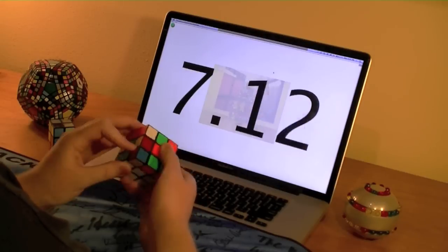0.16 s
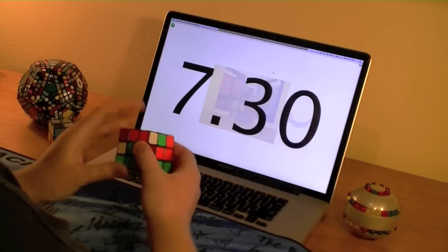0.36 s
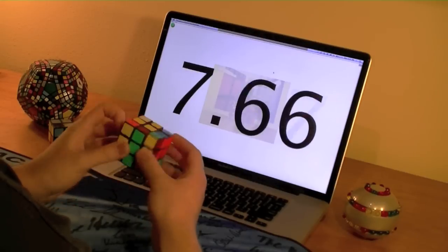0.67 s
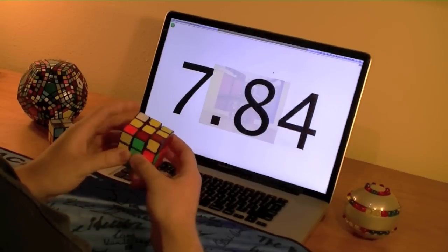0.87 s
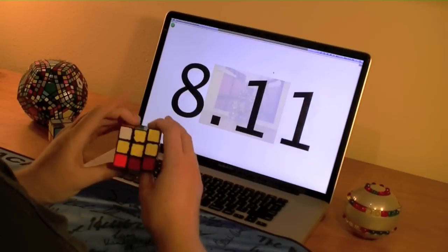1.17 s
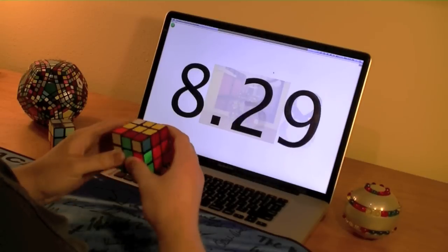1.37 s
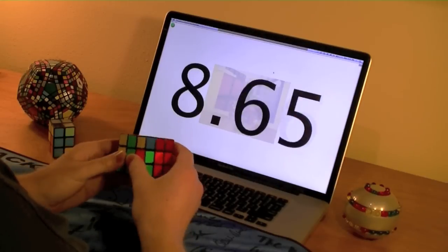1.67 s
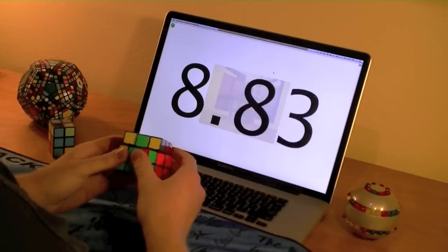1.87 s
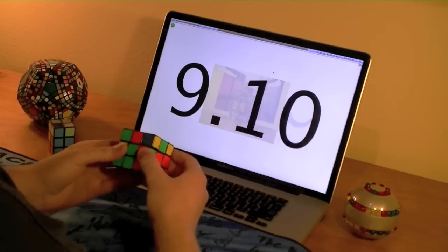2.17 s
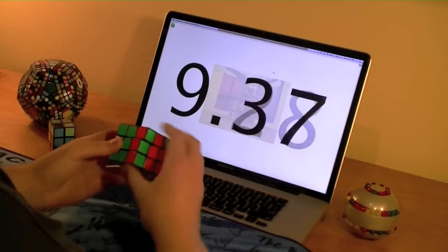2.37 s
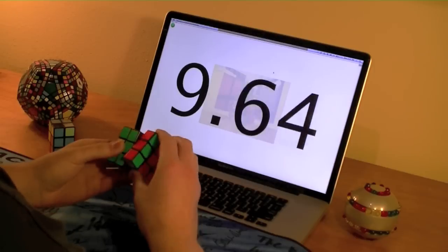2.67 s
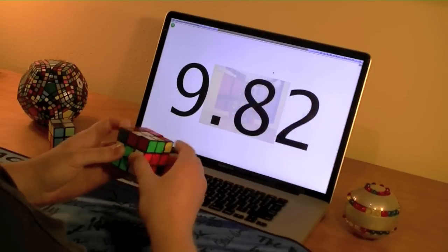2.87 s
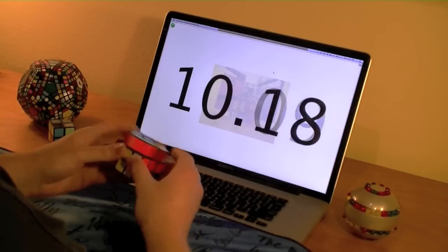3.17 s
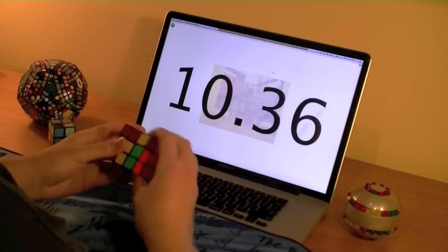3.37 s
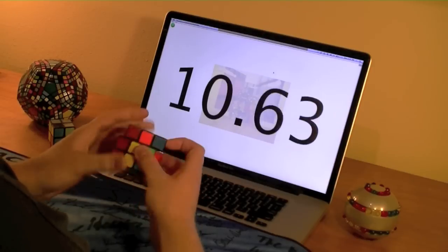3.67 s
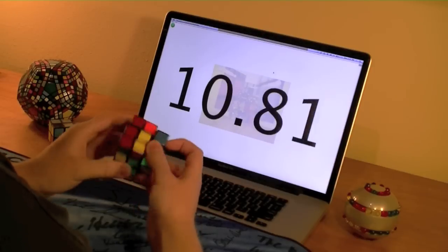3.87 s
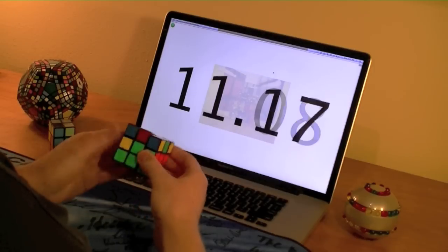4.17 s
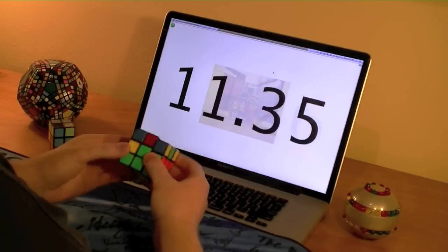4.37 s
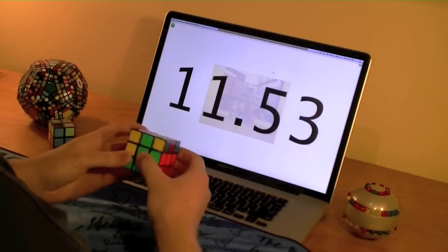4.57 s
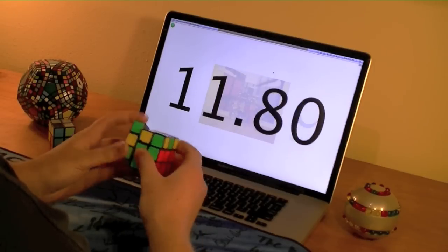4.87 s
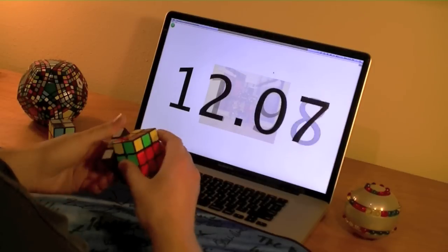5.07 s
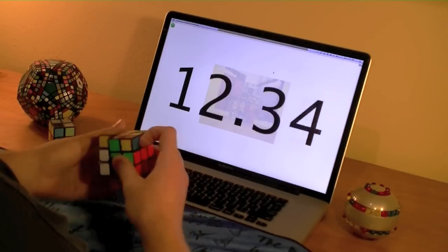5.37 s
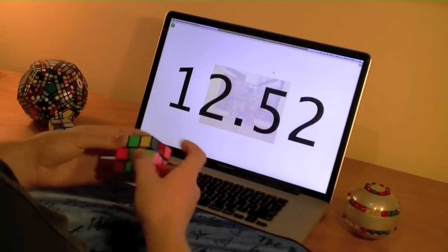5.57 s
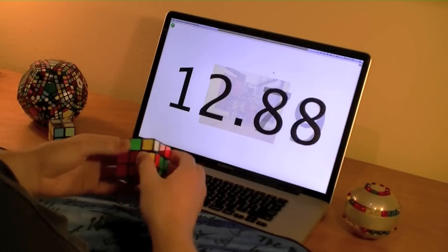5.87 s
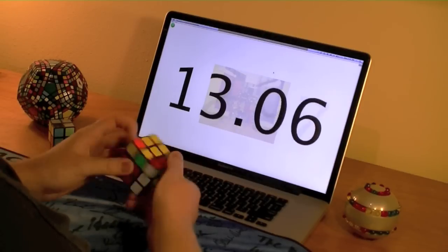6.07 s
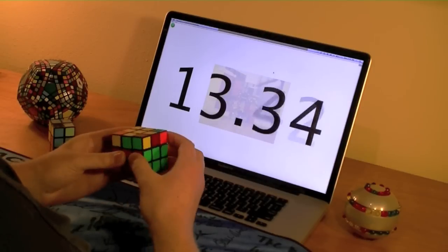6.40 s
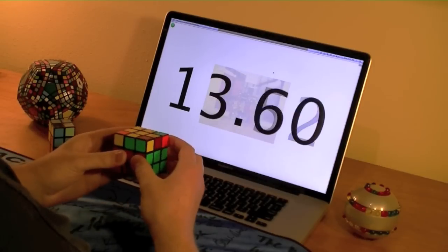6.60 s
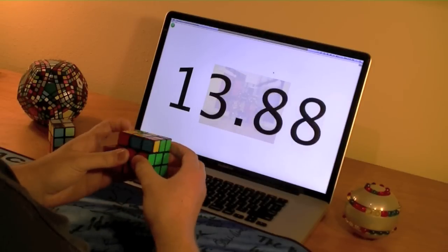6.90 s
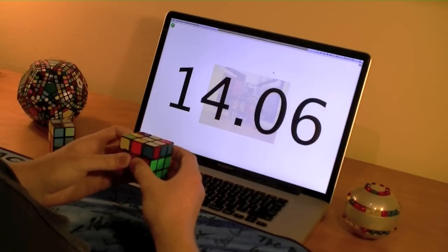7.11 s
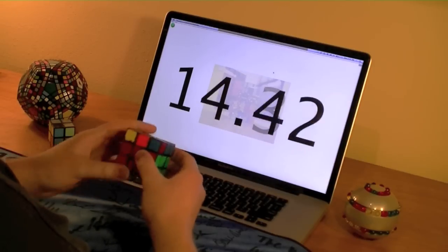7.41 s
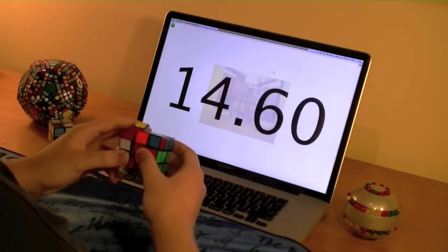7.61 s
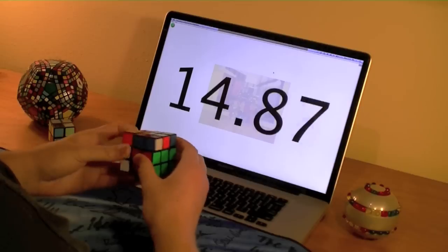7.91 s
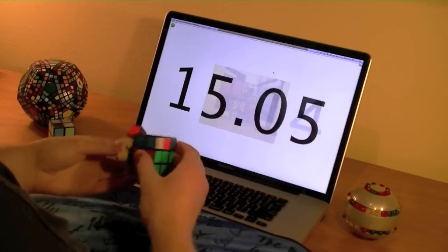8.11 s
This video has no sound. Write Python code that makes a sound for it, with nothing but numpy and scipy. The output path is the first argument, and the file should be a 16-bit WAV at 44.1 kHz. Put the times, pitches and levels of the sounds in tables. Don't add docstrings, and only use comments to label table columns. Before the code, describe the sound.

A plastic puzzle cube is turned fast by hand over a desk. Crisp locking snaps, flat slaps and hollow knocks come in irregular clusters, joined by very short gritty slides. Between clusters only faint finger touches remain. A close stereo microphone in a small quiet room catches a short reverberation over soft air noise and faint low hum.

```python
import sys
import numpy as np
from scipy import signal
from scipy.fft import rfft, irfft, next_fast_len
from scipy.io import wavfile

SR = 44100
rng = np.random.default_rng(int(sys.argv[2]) if len(sys.argv) > 2 else 0)


def ratio_of_db(decibels):
    return 10 ** (np.asarray(decibels, float) / 20)


def transcribe(signal):
    frames = np.atleast_2d(signal).T
    limited = np.clip(frames, -1, 1)
    pcm = np.round(limited * 32767).astype(np.int16)
    wavfile.write(sys.argv[1], SR, pcm)


N = 363825

# time in seconds, level in dB,
# hollow thud relative to it in dB, bright tick relative to it in dB.
LOCKS = [(.0307, -22.5, -0.5, 0.5), (.2012, -18, 2, 4.5), (.2352, -23, -5, -2.5), (.6849, -17, -25, 5.5),
         (.6864, -21, 4, -3), (.8358, -23.5, -8.5, -1.5), (2.3145, -27.5, 4.5, 1),
         (2.8569, -18.5, 3.5, -1.5), (2.8948, -19, -34, 1.5), (2.9037, -12, -5.5, 1),
         (3.204, -27, -14, 9.5), (3.2645, -32, 9, 3), (3.3008, -21.5, -12, 1), (3.9768, -23.5, 1.5, -21),
         (4.5319, -23, -1.5, 4.5), (4.7492, -19.5, -23, 0), (4.7609, -11.5, -13.5, 0.5),
         (4.9875, -18.5, -8, -1.5), (5.0331, -14, -2.5, -1), (5.4154, -17.5, -1, 2), (5.654, -27.5, 5, 6.5),
         (6.0641, -21, -13, -1), (6.0966, -21.5, 1, 0), (6.1736, -20.5, 2, -1), (6.2445, -21.5, -10.5, 2.5),
         (7.8611, -20, -3, 5), (7.9077, -16.5, -11, 3.5), (8.1636, -17.5, -2.5, 2),
         (8.2237, -23.5, 0.5, 8.5), (8.2307, -20.5, -4.5, 5)]
# time in seconds, level in dB.
CATCHES = [(.5502, -45.5), (.9947, -50), (2.0017, -32), (2.3191, -29.5), (2.8271, -35.5), (3.1024, -39),
           (3.304, -23), (3.3902, -32), (3.6856, -33), (3.688, -32.5), (3.9638, -24), (3.9804, -22.5),
           (4.4963, -36), (4.5259, -26), (5.7191, -34), (5.9401, -42.5), (6.6924, -40), (6.8171, -43),
           (6.8555, -27), (6.9941, -26.5), (7.054, -35), (7.1009, -28), (7.2212, -38.5), (7.5939, -57),
           (7.8303, -38.5), (7.8859, -21.5), (8.1291, -25)]
# time in seconds, level in dB.
CLACKS = [(.135, -32), (.169, -34), (.1941, -25.5), (.4165, -35), (.6729, -29.5), (1.2996, -45.5),
          (1.4396, -47.5), (2.5934, -43), (3.1962, -32.5), (3.2558, -21.5), (3.4664, -26), (3.7232, -31),
          (3.9564, -44), (4.4847, -41), (4.6439, -40), (4.7388, -30), (4.7454, -25), (5.0305, -14),
          (5.2613, -46), (5.3696, -30.5), (5.4091, -30), (5.658, -23), (6.1334, -21), (6.838, -41),
          (6.9569, -43), (7.5485, -42), (7.5659, -41), (7.6109, -35.5), (8.1843, -19)]
# time in seconds, level in dB.
KNOCKS = [(.0178, -47), (.1541, -33.5), (.4467, -39.5), (.6275, -48), (.6367, -36.5), (.8284, -33.5),
          (1.8222, -44.5), (1.9798, -50), (1.9957, -29.5), (2.2653, -43), (2.2978, -35.5), (2.6278, -45.5),
          (3.3968, -32.5), (3.4206, -24), (3.7393, -33), (3.8304, -40.5), (4.1865, -46.5), (4.7009, -31.5),
          (4.9228, -38), (5.2712, -31.5), (5.3226, -35.5), (5.5873, -39), (6.0373, -34.5), (6.0813, -26),
          (6.1223, -27.5), (6.8423, -35), (7.4615, -46.5), (7.6844, -42.5), (7.8596, -24), (7.893, -26.5)]
# time in seconds, level in dB.
NUDGES = [(.1038, -38), (.8023, -29), (1.1154, -47), (1.4435, -44), (1.5731, -51), (1.8508, -41),
          (2.251, -58), (2.2835, -49.5), (2.5099, -43.5), (2.5415, -44), (3.1666, -49), (3.1764, -49),
          (3.5921, -51), (3.6506, -65), (3.6697, -46.5), (3.7595, -34), (3.9485, -64), (4.2385, -48),
          (4.4528, -51), (4.9114, -28), (5.8954, -30.5), (5.9949, -35.5), (7.589, -36), (7.6614, -44.5),
          (7.773, -46)]
# time in seconds, level in dB.
TOUCHES = [(1.071, -49), (1.1857, -56), (1.3728, -53.5), (1.4245, -57), (1.5224, -53), (1.6362, -56),
           (1.7554, -57), (1.7909, -53), (2.1525, -64), (2.1934, -55), (2.4793, -55), (4.4147, -56),
           (6.4293, -58), (6.4572, -55.5), (7.4413, -56), (7.759, -59), (8.108, -58)]
# time in seconds, level in dB.
FLICKS = [(.3544, -53.5), (.5143, -59), (2.4277, -50.5), (2.7816, -66), (3.25, -26), (3.902, -52),
          (6.9527, -51.5), (7.1009, -38.5), (7.5416, -47), (7.6109, -46.5)]
# hollow thud and bright tick, relative dB.
CATCH_COLOUR, CLACK_COLOUR, KNOCK_COLOUR = (-1.3, 2.33), (-18, -3.8), (3.1, -6.5)
NUDGE_COLOUR, TOUCH_COLOUR, FLICK_COLOUR = (1, -2), (-2.5, -2.5), (-23, 9.7)


def contacts():
    kinds = [(CATCHES, CATCH_COLOUR), (CLACKS, CLACK_COLOUR), (KNOCKS, KNOCK_COLOUR),
             (NUDGES, NUDGE_COLOUR), (TOUCHES, TOUCH_COLOUR), (FLICKS, FLICK_COLOUR)]
    shaded = [row + shade for rows, shade in kinds for row in rows]
    return np.transpose(LOCKS + shaded)


DESK_ECHO_S, DESK_ECHO_DB = 0.0032, -10


def snaps(knock_s, thud_s, size=600):
    s, peak_db, thud_db, tick_db = contacts()
    t = np.arange(size) / SR
    first = np.round((s - knock_s) * SR).astype(int)
    at = (first[:, None] + np.arange(size)).ravel()
    rattle = rng.standard_normal((len(s), size))
    parts = [(thud_db + 0.5, thud_s), (0 * s, knock_s), (tick_db + 4.0, knock_s)]
    out = np.zeros((2, N))
    for k, (db, tau) in enumerate(parts):
        knock = t / tau * np.exp(-t / tau)
        echo = ratio_of_db(DESK_ECHO_DB) * np.interp(t - DESK_ECHO_S, t, knock)
        shape = rattle * (knock + echo)
        shape = shape / np.sqrt(np.sum(shape ** 2, axis=1, keepdims=True))
        strength = ratio_of_db(peak_db + db)[:, None]
        click = t == 0
        trains = [np.bincount(at, (strength * w).ravel(), N + size)[:N] for w in (shape, click)]
        out += split(np.array(trains) + 1e-18)[k]
    return out


# start of full speed in seconds, time held in seconds,
# grit level in dB, hollow share in dB.
TURNS = [(.04, 0.03, -43, 3), (0.149, 0.09, -37, -9), (.43, .01, -61.5, -2), (.55, 0.025, -52, -1),
         (.69, 0.074, -36.5, -3), (1.856, .01, -49.5, 1), (2.004, 0.037, -42.5, 1.5),
         (2.327, 0.014, -30.5, -1.5), (2.871, 0.082, -33, 1), (3.209, .02, -34.5, 0),
         (3.253, 0.016, -29, 1.5), (3.43, 0.04, -45, 8), (3.68, .25, -62, 1), (3.973, .005, -30, -13),
         (4.533, 0.0042, -27.5, 0.5), (4.761, 0.0027, -33, 4.5), (4.919, 0.0085, -35, -15),
         (5.039, 0.025, -35, -10), (5.27, .26, -47.5, 0), (5.598, 0.0037, -44, 6), (5.659, 0.046, -41, -4),
         (5.899, 0.0054, -48.5, 2.5), (6.091, 0.063, -30.5, -10), (6.199, 0.069, -38.5, 1.5),
         (6.865, 0.011, -35, -1.5), (7.115, 0.014, -37, -1.5), (7.545, .005, -45, -4),
         (7.874, 0.023, -32, 0.5), (8.171, 0.075, -30, -6.5)]
SPEED_UP_DB_PER_S, SLOW_DOWN_DB_PER_S = 500, 445


def turning(t):
    s, held, db, hollow_db = np.transpose(TURNS)[:, :, None]
    before = np.maximum(s - t, 0)
    after = np.maximum(t - s - held, 0)
    each = ratio_of_db(db - SPEED_UP_DB_PER_S * before - SLOW_DOWN_DB_PER_S * after)
    return np.sum(each, axis=0), np.sum(each * ratio_of_db(hollow_db), axis=0)


# time in seconds, level in dB.
GRIP = [(0, -64), (.9, -62), (1.78, -72), (2.42, -64.5), (2.8, -65.5), (3.1, -50.5), (4.1, -68),
        (4.44, -68.5), (4.85, -63.5), (5.85, -57.5), (6.36, -77), (6.67, -79), (6.72, -67), (7.3, -71.5),
        (7.63, -57.5), (8.25, -84)]
GRIP_HOLLOW_DB = 0.5


def slide(per_s, spread_db, smooth, slip_t60):
    t = np.arange(N) / SR
    turn, hollow = [np.interp(t, t[::32], v) for v in turning(t[::32])]
    grip = ratio_of_db(np.interp(t, *np.transpose(GRIP)))
    sizes = ratio_of_db(spread_db * np.minimum(rng.exponential(1, N), 4))
    slipping = rng.random(N) < per_s / SR
    slips = np.sqrt(linger(sizes ** 2 * slipping, slip_t60))
    grains = (rms_one(slips) + smooth) * rng.standard_normal(N)
    low, middle, high = split(grains)
    return (hollow + ratio_of_db(GRIP_HOLLOW_DB) * grip) * low + (turn + grip) * (middle + high)


RING_HZ = [607, 679, 721, 804, 879, 958, 1018, 1156, 1266, 1685, 1864, 2189, 2920]
# level in dB, t60 in seconds.
RING_DECAY = [(-4, 0.22), (-14, 0.2), (0, 0.13), (-1, 0.13), (-6, 0.12), (-5, 0.11), (0.5, 0.1),
              (-6, 0.07), (-5, 0.11), (-10, 0.08), (-11, 0.09), (-9, 0.06), (-14, 0.033)]
DRIFT_S, DRIFT_DB = .08, 3.5


def ringing(x):
    t = np.arange(N) / SR
    steps = np.arange(0, N / SR + DRIFT_S, DRIFT_S)
    freedom = rng.standard_normal((len(RING_DECAY), len(steps)))
    out = 0
    for hz, (db, t60), free in zip(RING_HZ, RING_DECAY, freedom):
        r, w = ratio_of_db(-60 / (t60 * SR)), 2 * np.pi * hz / SR
        damping_db = DRIFT_DB * np.interp(t, steps, np.minimum(free, 1))
        struck = x * ratio_of_db(db + damping_db)
        out = out + signal.lfilter([0, np.sin(w)], [1, -2 * r * np.cos(w), r * r], struck)
    return out


# time in seconds, peak level in dB, pitch in Hz.
BUMPS = [(2.65, -53, 211), (4.427, -53.5, 170), (5.036, -47, 208), (5.182, -60, 260), (7.774, -55, 197)]


def bumps(soft_s):
    s, db, hz = np.transpose(BUMPS)[:, :, None]
    t = np.maximum(np.arange(N) / SR - s, 0)
    swell = np.e * t / soft_s * np.exp(-t / soft_s)
    return np.sum(ratio_of_db(db) * swell * np.sin(2 * np.pi * hz * t), axis=0)


# frequency in Hz, t60 in seconds.
ROOM_T60 = [(300, 1), (800, 0.56), (2000, 0.33), (5500, 0.32), (9000, 0.3), (14000, 0.15)]


def room(x, early_db, early_t60, arrive_t60, first_s, lumpy_db):
    x = np.concatenate([np.zeros(round(first_s * SR)), x])[:N]
    clusters = rms_one(linger(rng.standard_normal(N), 0.0036))
    lumps = ratio_of_db(lumpy_db * clusters)
    white = rng.standard_normal((2, 2, N)) * rms_one(lumps)
    edges = 210 * 2 ** np.arange(0, 6.5, .4)
    out = 0
    for k, (low, high) in enumerate(zip(edges, edges[1:])):
        band = signal.butter(2, [low, high], "band", fs=SR, output="sos")
        power = linger(signal.sosfilt(band, x) ** 2, arrive_t60)
        late = linger(power, at_hz(ROOM_T60, np.sqrt(low * high)))
        early = ratio_of_db(2 * early_db) * linger(power, early_t60)
        echoes = signal.sosfilt(band, white[k % 2]) * np.sqrt(SR / 2 / (high - low))
        out = out + echoes * np.sqrt(late + early)
    return out


# frequency in Hz, level in dB per Hz.
AIR_MID = [(24, -50.5), (40, -3.5), (121, -1.5), (337, -5.5), (422, -3.5), (556, -7), (715, -6.5),
           (1070, -17), (1370, -9), (3060, -20), (5870, -21.5), (7170, -22.5), (11300, -31), (14100, -31.5),
           (16000, -55.5)]
# frequency in Hz, level in dB per Hz.
AIR_SIDE = [(15, -32), (25, -15), (229, -5.5), (516, -8.5), (887, -12.5), (1260, -16), (2760, -22),
            (3160, -24.5), (6740, -34.5), (8360, -27.5), (10100, -35.5), (14000, -45), (16000, -58.5)]
AIR_MID_DB, AIR_SIDE_DB = -62.5, -56.5
# frequency in Hz, level in dB rms,
# sign at the moment they cancel.
HUM = [(121.08, -69, 1), (120.01, -74, -1), (160.49, -80, 1), (240.04, -87, 1)]
HUM_CANCEL_S = 0.66
# frequency in Hz, level in dB rms, width in Hz.
WHINES = [(728, -73, 22), (7340, -90, 60), (9400, -90, 80), (11050, -91, 50)]


def room_air():
    mid, side = rng.standard_normal((2, N))
    mid = ratio_of_db(AIR_MID_DB) * convolve(mid, colour(AIR_MID))
    side = ratio_of_db(AIR_SIDE_DB) * convolve(side, colour(AIR_SIDE))
    t = np.arange(N) / SR - HUM_CANCEL_S
    for hz, db, sign in HUM:
        mid = mid + sign * np.sqrt(2) * ratio_of_db(db) * np.sin(2 * np.pi * hz * t)
    for hz, db, width_hz in WHINES:
        r, w = np.exp(-np.pi * width_hz / SR), 2 * np.pi * hz / SR
        whine = signal.lfilter([1, 0, -1], [1, -2 * r * np.cos(w), r * r], rng.standard_normal(N))
        mid = mid + ratio_of_db(db) * rms_one(whine)
    return np.array([mid, side])


THUD_HZ, TICK_HZ = 1400, 6350


def split(x):
    low = signal.sosfilt(signal.butter(2, THUD_HZ, fs=SR, output="sos"), x)
    high = signal.sosfilt(signal.butter(2, TICK_HZ, "high", fs=SR, output="sos"), x)
    middle = signal.sosfilt(signal.butter(1, [THUD_HZ, TICK_HZ], "band", fs=SR, output="sos"), x)
    return low, middle, high


def linger(power, t60):
    r = ratio_of_db(-120 / (t60 * SR))
    return signal.lfilter([1 - r], [1, -r], power)


def rms_one(x):
    return x / np.sqrt(np.mean(x ** 2) + 1e-20)


def at_hz(points, hz):
    point_hz, values = np.transpose(points)
    return np.interp(np.log(hz + 1), np.log(point_hz), values)


def convolve(x, h):
    size = next_fast_len(N + h.shape[-1])
    return irfft(rfft(x, size) * rfft(h, size), size)[..., :N]


def colour(spectrum, size=4096):
    magnitude = ratio_of_db(at_hz(spectrum, np.fft.rfftfreq(size, 1 / SR)))
    cepstrum = irfft(np.log(magnitude), size)
    cepstrum[1:size // 2] *= 2
    cepstrum[size // 2 + 1:] = 0
    h = irfft(np.exp(rfft(cepstrum)), size)
    return h / np.sqrt(np.sum(h ** 2))


# frequency in Hz, level in dB per Hz.
OVERALL_TONE = [(120, -60), (220, -29), (380, -17.5), (540, -19), (700, -3.5), (1020, -2.5), (1500, 1),
                (5060, -1), (7600, -3), (9800, -13), (12300, -26), (13500, -24), (14300, -43.5), (16500, -35)]
# frequency in Hz, side minus mid in dB.
WIDTH = [(200, 2.5), (380, -5.5), (700, -4), (1290, -4.5), (2380, -9.5), (4400, -13), (8120, -1.5),
         (11000, 4), (15000, -11)]
EVEN_SHARE, OWN_SHARE = .55, .83
ROOM_DB, LEAN_HZ = -4.5, 1800


def scene():
    heard, even = ratio_of_db(23.0) * snaps(knock_s=.00075, thud_s=0.0026)
    grit = slide(per_s=400, spread_db=3.0, smooth=0.17, slip_t60=0.006)
    spread = EVEN_SHARE * even + OWN_SHARE * heard + grit
    mid_tail, side_tail = room(spread, early_db=-2.5, early_t60=0.056, arrive_t60=0.0029,
                               first_s=.003, lumpy_db=0.8)
    mid = heard + grit + ratio_of_db(ROOM_DB) * mid_tail + ratio_of_db(-37.5) * ringing(spread)
    side = ratio_of_db(-11.0) * convolve(side_tail + 0.067 * (heard + grit), colour(WIDTH))
    mid, side = convolve(np.array([mid, side]), colour(OVERALL_TONE)) + room_air()
    mid = mid + bumps(soft_s=0.0052)
    bass = signal.sosfilt(signal.butter(1, LEAN_HZ, fs=SR, output="sos"), mid)
    side = side - 0.11 * bass
    return np.array([mid + side, mid - side])


def top_cut(x):
    return signal.sosfilt(signal.butter(12, 16640, fs=SR, output="sos"), x)


def record(dry):
    low_pass = signal.cheby2(10, 60, 16900, fs=SR, output="sos")
    mix = signal.sosfilt(low_pass, dry)
    return top_cut(mix)


dry = scene()
out = record(dry)
transcribe(out)
```